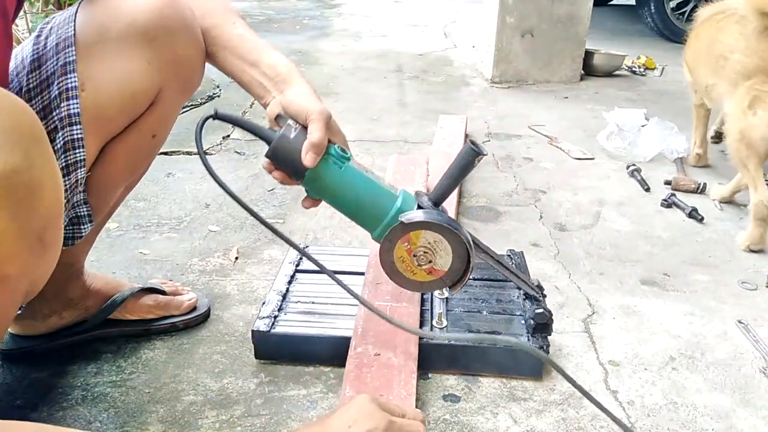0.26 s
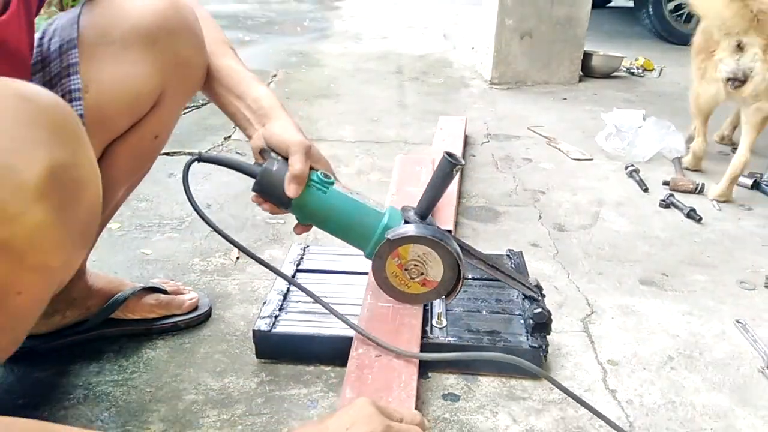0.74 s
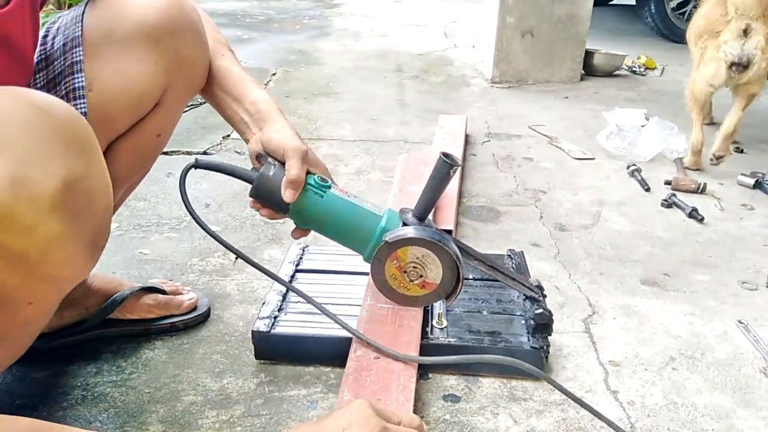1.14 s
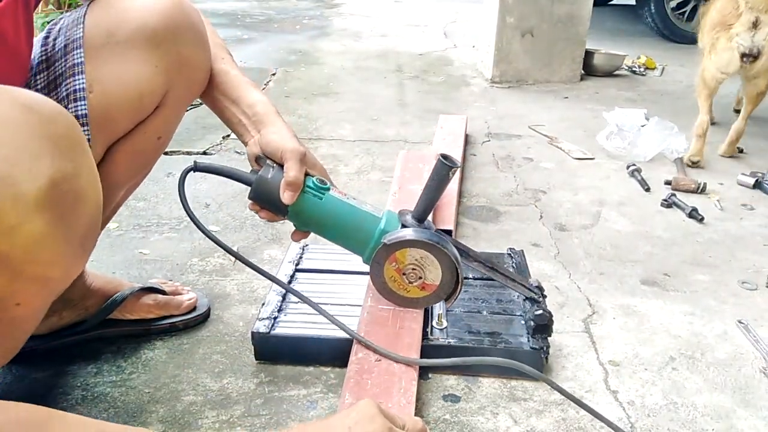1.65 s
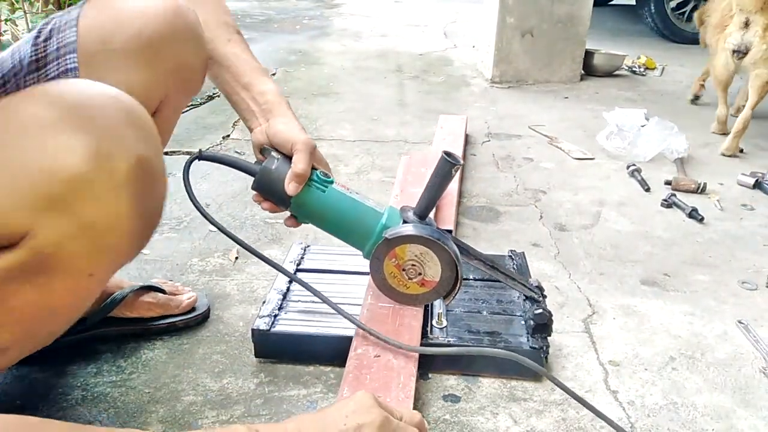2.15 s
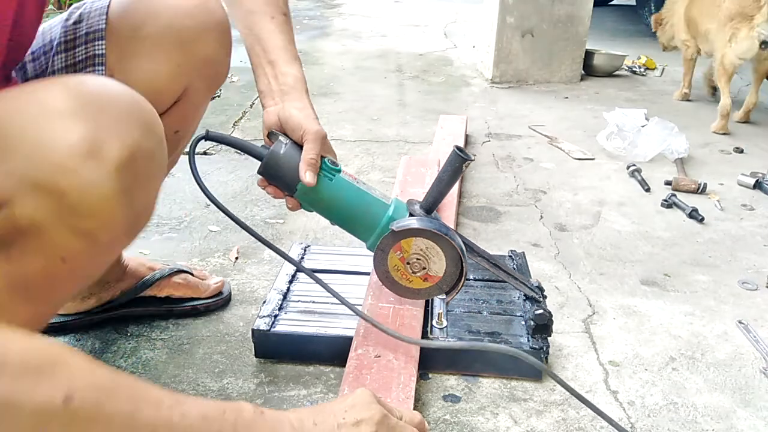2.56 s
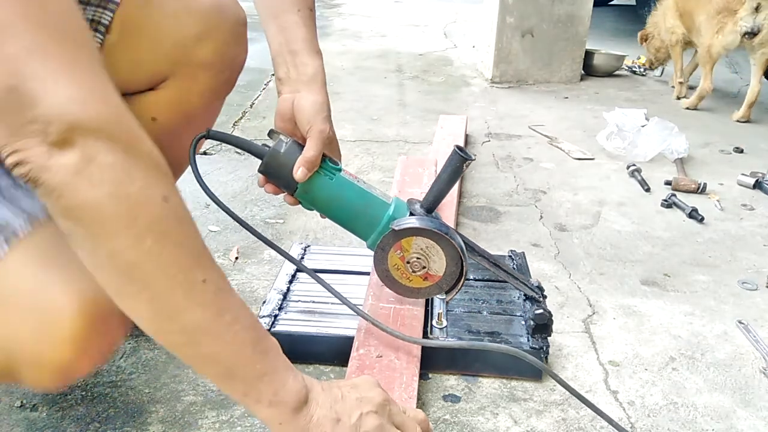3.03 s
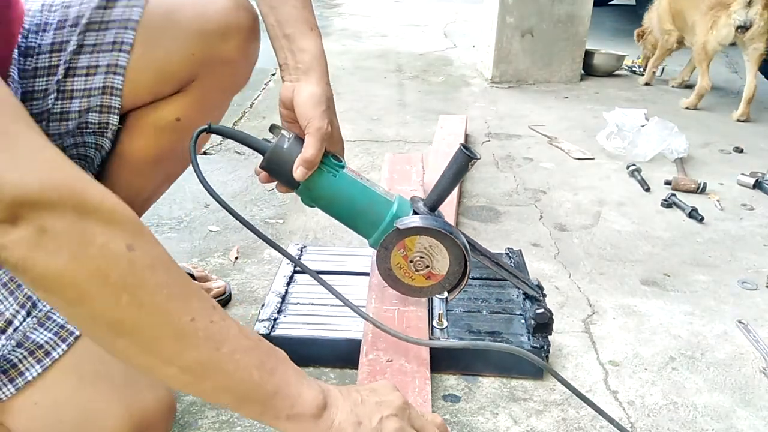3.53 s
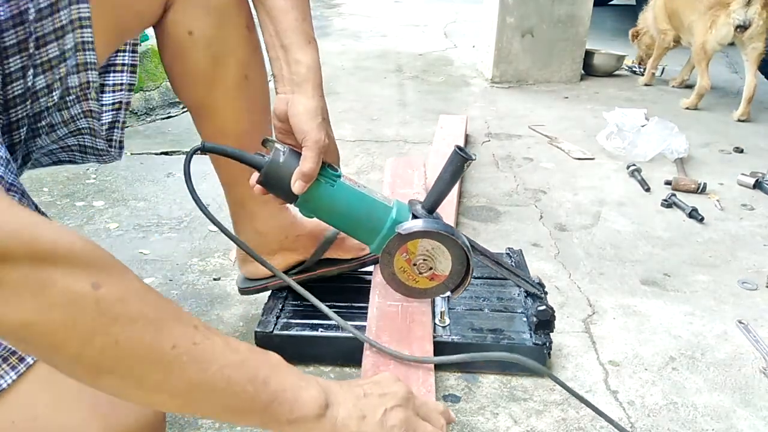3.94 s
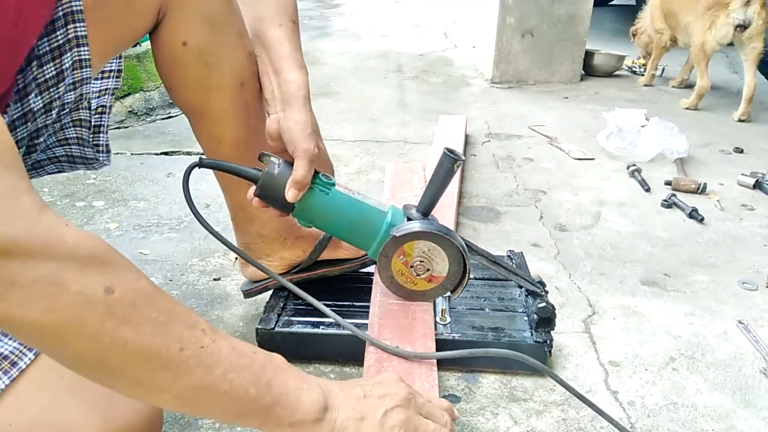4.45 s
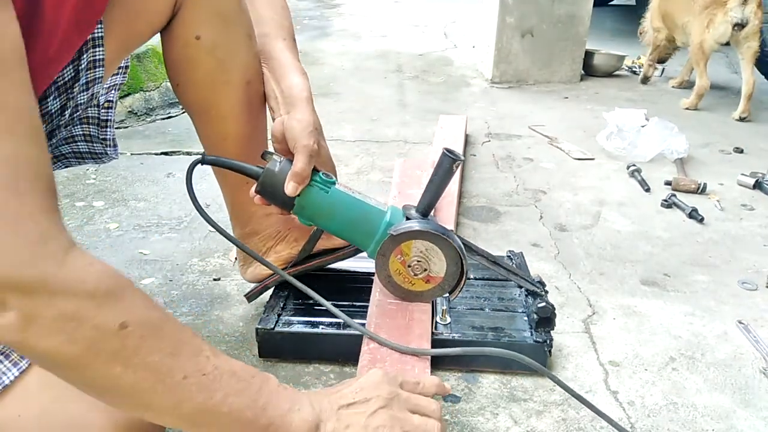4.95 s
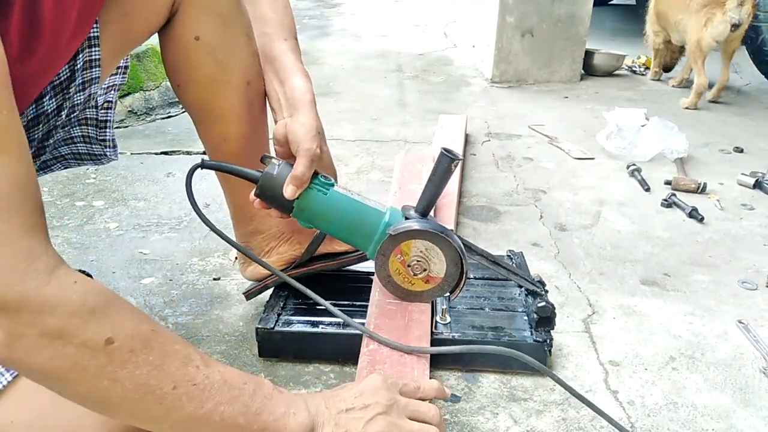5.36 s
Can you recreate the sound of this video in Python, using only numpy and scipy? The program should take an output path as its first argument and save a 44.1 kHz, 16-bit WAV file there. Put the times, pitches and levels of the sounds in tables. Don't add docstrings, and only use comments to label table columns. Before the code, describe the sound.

In a concrete yard, metal is nudged against metal: light taps, short gritty scrapes and a sharper knock just after one second. A quiet lull with faint ringing follows, then scrapes and padded thumps. A loud double clank and shudder hits near four seconds, trailed by smaller knocks. Close stereo phone pickup, with slightly chirpy, patchy treble.

```python
import sys
import numpy as np
from scipy import signal
from scipy.fft import rfft, irfft, next_fast_len
from scipy.io import wavfile
from scipy.ndimage import uniform_filter1d, map_coordinates

SR = 44100
rng = np.random.default_rng(int(sys.argv[2]) if len(sys.argv) > 2 else 0)


def master_out(mix):
    frames = np.transpose(np.atleast_2d(mix))
    ceiling = np.clip(frames, -1, 1)
    pcm = np.round(ceiling * 32767).astype(np.int16)
    wavfile.write(sys.argv[1], SR, pcm)


def convert_level_to_amplitude(level_db):
    exponent = np.asarray(level_db, float) / 20
    return 10 ** exponent


N = 246519
SHORT, TAIL, LONG = 1 << 13, 3 << 13, 1 << 15


def unit(x):
    return x / np.sqrt(np.mean(x ** 2) + 1e-20)


def peak(x):
    return x / np.abs(x).max()


def along(points, hz):
    f, v = np.transpose(points)
    return np.interp(np.log(hz + 1), np.log(f + 1), v)


def envelope(points, t):
    return np.interp(t, *np.transpose(points))


def grains(size, spike_db):
    jumps = np.repeat(np.minimum(rng.exponential(size=size // 40 + 1), 3.5), 40)[:size]
    return convert_level_to_amplitude(spike_db * jumps) * rng.standard_normal((2, size))


def ringing(modes, hz, scatter_db=0):
    low = 1j * hz / (0.23 * modes[0][0])
    high = 1j * hz / (2.23 * modes[-1][0])
    rings = 0
    for k, (centre, width, db) in enumerate(modes):
        gain = (-1) ** k * convert_level_to_amplitude(db + scatter_db * rng.standard_normal())
        rings = rings + gain * 1j * hz * width / (centre ** 2 - hz ** 2 + 1j * hz * width)
    return rings * (low / (1 + low) / (1 + high)) ** 2


# pitch in Hz, width in Hz, level in dB.
STAND = [(348, 112, -11), (502.3, 47, -2.5), (700, 45, -0.5), (849, 22.3, -0.5), (850, 167, -2.5),
         (1021, 210, -3), (1201, 39, -3)]


def stand_body(hz, scatter_db=0):
    return ringing(STAND, hz, scatter_db)


# pitch in Hz, width in Hz, level in dB.
TUBE = [(1395, 620, -2.5), (1800, 185, 5), (1905, 406, 1), (2508, 270, 1.5), (2823, 276, 2),
        (3685, 1950, -6), (4960, 700, -5)]


def tube_body(hz, scatter_db=0):
    return ringing(TUBE, hz, scatter_db)


# pitch in Hz, width in Hz, level in dB.
GRIT = [(5910, 3730, -10), (7174, 804, -3), (8170, 1000, -1), (9570, 4100, -5), (11760, 3260, -11)]


def grit_body(hz, scatter_db=0):
    return ringing(GRIT, hz, scatter_db)


# frequency in Hz, level in dB per Hz.
RUMBLE = [(15, -72), (25, -40), (48, -18.5), (102, -7.5), (260, -8.5), (400, -13.5), (520, -17),
          (880, -120)]


def floor_body(hz):
    return convert_level_to_amplitude(along(RUMBLE, hz))


# time in seconds, level in dB.
GRIP = [(0, 1.5), (.4, 0.5), (.55, 1), (.72, -4), (1.17, 3.5), (1.35, 1), (1.5, -6.5), (1.9, -5),
        (2.2, 6.5), (3.0, 4), (3.3, 0), (4.0, -1), (4.6, 3), (5.0, 2.5), (5.59, 1)]


def grip_db(t):
    return envelope(GRIP, t)


# frequency in Hz, left-right correlation.
ALIKE = [(60, 0.99), (180, 0.93), (530, 0.85), (1560, 0.41), (3000, 0.22), (5500, -0.13), (13700, -0.12)]


def ports(pair, response):
    hz = np.fft.rfftfreq(pair.shape[1], 1 / SR)
    turn = np.arccos(np.clip(along(ALIKE, hz), -1, 1)) / 2
    mid, side = irfft(rfft(pair) * response(hz) * [np.cos(turn), np.sin(turn)], pair.shape[1])
    return np.array([mid + side, mid - side])


# frequency in Hz, t60 in seconds.
YARD = [(100, 0.56), (700, 0.29), (3000, 0.45), (8000, 0.37), (13000, 0.32)]


def yard(count):
    hz, t, z = signal.stft(rng.standard_normal((count, 2, SR // 2)), SR, nperseg=256)
    decay = convert_level_to_amplitude(-60 * t / along(YARD, hz)[:, None])
    tails = []
    for noise in signal.istft(z * decay, SR, nperseg=256)[1]:
        tail = ports(noise, np.ones_like)
        late = np.pad(tail, ((0, 0), (300, 0)))
        tails.append(rfft(late / np.linalg.norm(tail[0]), LONG))
    return tails


def add(track, sound, s, tail, wet_db):
    here = track[:, round(s * SR):]
    here[:, :sound.shape[1]] += sound
    here[:, :LONG] += convert_level_to_amplitude(wet_db) * irfft(rfft(sound.mean(axis=0), LONG) * tail, LONG)


# time in seconds, pressure in dB, grittiness in dB.
SLIDE = [(0.0, -47, 1), (0.25, -51, -5.5), (0.432, -42.5, -2.5), (0.55, -59.5, -7.5), (0.87, -74, 16.5),
         (1.0, -71, -49), (1.34, -69, -57), (1.6, -73, -31), (2.15, -60, -7), (2.3, -47.5, 7),
         (2.5, -65, 12), (2.71, -88.5, 7.5), (2.87, -65.5, 12.5), (3.45, -45.5, 0), (3.62, -55.5, 2),
         (4.7, -60.5, 9.5), (5.15, -56, 5), (5.59, -77.5, -8)]
# time in seconds, rumble in dB.
FEET = [(0, -50), (.28, -50.5), (.5, -53), (.75, -85), (.97, -55.5), (1.2, -80), (2.1, -76.5),
        (2.35, -57.5), (2.7, -88), (3.02, -49.5), (3.5, -54), (3.8, -54.5), (4.3, -49), (4.6, -54.5),
        (4.84, -69), (5.04, -46), (5.3, -61), (5.59, -87)]
# level in dB, share of the grittiness.
BODIES = [
    (-2.8, 1.56),
    (-4.5, 0.49),
    (-0.3, -0.098),
    (0.5, 0.038),
]
# start in seconds, level in dB, grittiness in dB.
SHUDDERS = [
    (4.032, -11, 0),
    (4.388, -33.5, -10.5),
    (4.96, -48, -13),
]
SHUDDER_RISE_S, SHUDDER_T60_S, SHUDDER_FLOOR_DB = 0.0067, 0.49, -13


def slide():
    t = np.arange(N) / SR
    s, press, gritty = np.transpose(SLIDE)
    press_db, gritty_db = np.interp(t, s, press), np.interp(t, s, gritty)
    grit_db, wall_db, stand_db = [press_db + share * gritty_db for _, share in BODIES[:3]]
    wall_db = wall_db + 0.9 * grip_db(t)
    drives = [grit_db, wall_db, stand_db, envelope(FEET, t)]
    bodies = [grit_body, tube_body, stand_body, floor_body]
    shake_dbs = [0, 0, 0, SHUDDER_FLOOR_DB]
    sound = 0
    for (body_db, share), body, drive_db, shake_db in zip(BODIES, bodies, drives, shake_dbs):
        clumps = map_coordinates(rng.standard_normal(200), [np.linspace(0, 199, N)])
        grind = unit(convert_level_to_amplitude(2 * clumps) * ports(grains(N, 1.8), body))
        force = convert_level_to_amplitude(drive_db)
        for start, db, shake_grit_db in SHUDDERS:
            since = np.clip(t - start, 0, None)
            decay = convert_level_to_amplitude(db + shake_db + share * shake_grit_db - 60 * since / SHUDDER_T60_S)
            force = force + decay * (1 - np.exp(-since / SHUDDER_RISE_S))
        sound = sound + convert_level_to_amplitude(body_db) * force * grind
    return sound


# time in seconds, level in dB.
LINGER = [(1.0, -74), (1.1, -90), (1.55, -77), (1.7, -67.5), (1.9, -61), (2.08, -65), (2.15, -66)]


def linger():
    s, db = np.transpose(LINGER)
    ring = unit(ports(grains(N, 0.51), lambda hz: ringing([(2025, 110, 0)], hz) ** 2))
    return convert_level_to_amplitude(np.interp(np.arange(N) / SR, s, db, left=-120, right=-120)) * ring


# start in seconds, peak in dB, pitch in Hz, t60 in seconds.
BUMPS = [(0.2, -27, 227, 0.067), (0.24, -41, 72, 0.21), (0.737, -44.5, 74, 0.07), (0.943, -39, 278, 0.13),
         (1.235, -45, 72, 0.16), (1.716, -40, 81, 0.089), (2.228, -47.5, 69.3, 0.13),
         (2.634, -60, 130, 0.046), (2.693, -46.5, 117, 0.052), (2.759, -51, 102, 0.056),
         (2.87, -48.5, 176, 0.24), (2.992, -30, 212, 0.026), (3.263, -20, 148, 0.029),
         (3.676, -46.5, 386, 0.092), (3.878, -22, 166, 0.043), (3.926, -17.5, 207, 0.025),
         (4.011, -21.5, 170, 0.11), (4.342, -31.5, 253, 0.083), (4.377, -21.5, 191.5, 0.058),
         (4.991, -26.5, 186, 0.068)]
# start in seconds, peak in dB, pitch in Hz, t60 in seconds.
BOOM = [
    (3.278, -39, 126.7, 0.56),
    (4.032, -30, 101, 0.77),
]


def bumps(tails):
    track, t = np.zeros((2, N + LONG)), np.arange(TAIL) / SR
    fade = np.cos(np.pi / 2 * t / t[-1])
    for (s, db, hz, t60), tail in zip([*BUMPS, *BOOM], tails):
        squeeze = 1 - np.exp(-(t * hz / 0.9) ** 2)
        push = squeeze * convert_level_to_amplitude(-60 * t / max(t60, 0.02)) * np.sin(2 * np.pi * hz * t)
        add(track, convert_level_to_amplitude(db) * peak(push) * fade * np.ones((2, 1)), s, tail, wet_db=-4.5)
    return track[:, :N]


# centre in seconds, grit in dB, half length in seconds,
# ring in Hz, ring level in dB.
STROKES = [(0.206, -27, 0.017, 570, -25), (1.826, -45.5, 0.058, 880, -52), (2.292, -29, 0.033, 2130, -46),
           (2.329, -21.5, 0.03, 1650, -32), (2.852, -27.5, 0.029, 2630, -39.5),
           (4.049, -24.5, 0.14, 975, -19.5), (5.422, -36, 0.029, 1000, -54), (5.55, -72, 0.015, 700, -47)]
# centre in seconds, grit in dB, half length in seconds,
# ring in Hz, ring level in dB.
SQUEAKS = [(0.653, -74, 0.037, 940, -41.5), (0.763, -46.5, 0.068, 345, -59.5),
           (1.573, -75.5, 0.005, 454, -45), (1.604, -57.5, 0.015, 2240, -57.5),
           (2.173, -49, 0.053, 323, -47), (2.381, -59, 0.07, 350, -53.5), (2.608, -98, 0.011, 483, -55),
           (2.693, -91, 0.013, 464, -60.5), (2.83, -85, .025, 714, -51.5), (3.229, -80, 0.11, 630, -43),
           (3.195, -40.5, 0.036, 2880, -48.5), (3.323, -43, 0.068, 2730, -47),
           (5.152, -33.5, 0.025, 1118, -37.5), (1.18, -56.5, 0.0075, 1600, -30),
           (1.445, -80, 0.019, 924, -48), (4.797, -58, 0.0065, 1510, -34),
           (4.968, -47.5, 0.011, 1755, -23.5), (5.529, -54, 0.013, 1800, -44)]
STROKE_WIDTH, SQUEAK_WIDTH = 0.93, 0.15


def strokes(tails):
    track, t = np.zeros((2, N + LONG)), (np.arange(SHORT) - SHORT / 2) / SR
    rows = [(*row, STROKE_WIDTH) for row in STROKES] + [(*row, SQUEAK_WIDTH) for row in SQUEAKS]
    for (s, db, half, ring_hz, ring_db, width), tail in zip(rows, tails):
        speed = np.exp(-(t / np.clip(half, 0.005, 0.06)) ** 2)
        grit = unit(ports(grains(SHORT, 0.36), grit_body))
        mode = [(ring_hz, width * ring_hz, 0)]
        ring = unit(ports(grains(SHORT, 2.9), lambda hz: ringing(mode, hz) ** 2))
        add(track, speed * (convert_level_to_amplitude(db) * grit + convert_level_to_amplitude(ring_db) * ring), s + t[0], tail, wet_db=-6.5)
    return track[:, :N]


# start in seconds, stand peak in dB, grit in dB re stand, loudest ring in Hz.
CLICKS = [(0.877, -40, -15, 1055), (2.094, -28, -12, 1800), (2.996, -29, 8, 550), (3.682, -23.5, 3.5, 1286)]
TAPS = [(0.156, -25, -26, 1024), (0.167, -25, -15, 490), (0.245, -48, 17, 640), (0.562, -46.5, -10.5, 900),
        (1.44, -44, -29, 980), (1.516, -51, -39, 1180), (1.569, -40, -37, 1100), (3.408, -33, -4.5, 1070),
        (0.697, -31.5, -15, 934), (3.876, -37, -5, 600), (4.333, -23.5, -6, 790), (4.377, -8.5, -42, 640),
        (4.931, -23, -12, 815)]
KNOCKS = [(0.06, -49.5, 13.5, 593), (0.116, -38.5, 7, 597), (0.593, -49.5, -6, 1020),
          (0.714, -27, -15, 1007), (0.939, -36, -1, 610), (0.947, -31, -5, 610), (1.165, -19.5, -21.5, 700),
          (1.176, -24, -25.5, 746), (2.143, -39, -0.5, 640), (3.325, -32.5, -2, 542),
          (3.487, -28, -9.5, 1036), (3.765, -36.5, 5, 1030), (3.882, -17, -7, 580), (3.903, -8.5, -7, 890),
          (4.434, -16, -16.5, 730), (4.623, -38.5, 6, 656), (4.709, -42, 5, 705), (4.788, -23, -5.5, 1490),
          (4.993, -22, 3, 638), (5.029, -32.5, 12.5, 646), (5.151, -26.5, -1, 624), (5.259, -32.5, 6, 930),
          (5.519, -33, 0.5, 1720)]
RATTLES = [(0.2, -23, -9.5, 497), (0.299, -35, 2.5, 1735), (0.623, -37, -20, 856), (0.654, -32.5, -18, 874),
           (3.431, -32.5, -19, 860), (1.262, -32, -7.5, 820), (1.374, -38, -9.5, 1054),
           (1.596, -44.5, -17, 1156), (1.74, -37.5, -8.5, 684), (1.802, -33, -6.5, 1015),
           (2.88, -33.5, 7.5, 710), (3.163, -39, -2.5, 626), (3.93, -6.5, -4, 582), (4.017, -0.5, -10, 967),
           (4.048, -5, -20, 988), (4.339, -13.5, -1.5, 790), (4.902, -19, -4, 1658), (4.959, -15, 1, 667),
           (5.375, -37.5, 2, 954)]
CLICK_S, TAP_S, KNOCK_S, RATTLE_S = 0.0036, 0.017, 0.012, 0.026
WALL_DB, WALL_PER_GRIT, WALL_PER_BLOW, WALL_PER_OCTAVE = -2.5, 0.24, 0.098, 0.83
REACH_HZ = 332


def knocks(tails):
    track, t = np.zeros((2, N + LONG)), np.arange(SHORT) / SR
    kinds = [(CLICKS, CLICK_S), (TAPS, TAP_S), (KNOCKS, KNOCK_S), (RATTLES, RATTLE_S)]
    contacts = [(*row, chatter) for rows, chatter in kinds for row in rows]
    first = 7 * np.exp(-t * SR / 3) * [[1], [0.4]]
    for k, (s, db, grit_db, ring_hz, chatter) in enumerate(contacts):
        tail = tails[k % len(tails)]
        tube_db = WALL_DB + WALL_PER_GRIT * grit_db + WALL_PER_BLOW * db
        tube_db += WALL_PER_OCTAVE * np.log2(ring_hz / 700) + grip_db(s)
        rebounds = (1 - np.exp(-t / (0.071 * chatter))) * np.exp(-(t / chatter) ** 1.9)
        force = rebounds + 0.018 / chatter * np.exp(-t / 0.0015)
        stand = ports(1.96 * first + force * grains(SHORT, 5.2),
                      lambda hz: stand_body(hz, scatter_db=0.5) * (1j * hz / (1j * hz + REACH_HZ)) ** 2)
        tube = ports(0.99 * first + force * grains(SHORT, 2.51), lambda hz: tube_body(hz, scatter_db=1.0))
        grit = ports(force * grains(SHORT, 0.69), lambda hz: grit_body(hz, scatter_db=2.0))
        blow = peak(stand) + convert_level_to_amplitude(tube_db + 6.0) * peak(tube) + convert_level_to_amplitude(grit_db + 11) * peak(grit)
        add(track, convert_level_to_amplitude(db - 1.5) * blow, s, tail, wet_db=0.0)
        spot = ports(1.64 * first + force * grains(SHORT, 3.9), lambda hz: ringing([(ring_hz, 50, 0)], hz))
        add(track, convert_level_to_amplitude(db - 3.0) * peak(spot), s, tail, wet_db=-6.5)
    return track[:, :N]


def scene():
    tails = yard(count=28)
    return slide() + linger() + bumps(tails) + strokes(tails) + knocks(tails)


def suppressed(x, margin_db, chance_db, floor_db):
    hz, _, z = signal.stft(x, SR, nperseg=1024)
    power = np.abs(z) ** 2 + 1e-20
    around = np.abs(uniform_filter1d(power.mean(axis=0), size=160, axis=0))
    chance = uniform_filter1d(rng.standard_normal(around.shape), size=4, axis=0)
    chance = uniform_filter1d(chance, size=7, axis=1)
    noise = around * convert_level_to_amplitude(-2 * margin_db) + convert_level_to_amplitude(2 * floor_db)
    noise = noise * convert_level_to_amplitude(2 * chance_db * unit(chance)) * (hz[:, None] > 2200)
    gain = np.sqrt(np.clip(1 - noise / power, 0.004, 1))
    return signal.istft(z * gain, SR, nperseg=1024)[1][:, :N]


# frequency in Hz, left minus right in dB.
LEAN = [(60, -1.5), (180, 2), (530, 1), (1560, 1.5), (4610, -.5), (8500, 3.5), (13700, 4.5)]


def roll_off(x):
    return signal.sosfilt(signal.butter(12, 14260, fs=SR, output="sos"), x)


def record(dry):
    size = next_fast_len(N)
    hz = np.fft.rfftfreq(size, 1 / SR)
    lean = along(LEAN, hz) / 2
    bass = 1j * hz / 55
    response = convert_level_to_amplitude(np.array([lean, -lean])) * (bass / (1 + bass)) ** 2 * (hz < 14250)
    x = irfft(rfft(dry, size) * response, size)[:, :N]
    x = suppressed(x, margin_db=9, chance_db=5.5, floor_db=-99)
    return roll_off(np.clip(x, -1, 1))


dry = scene()
out = record(dry)
master_out(out)
```